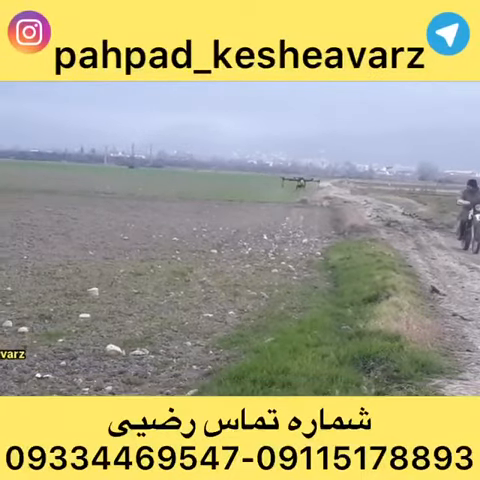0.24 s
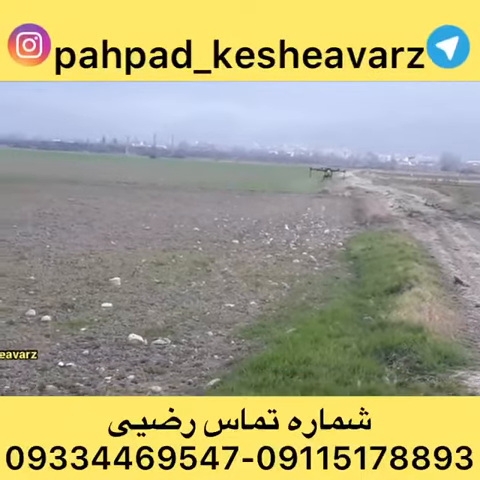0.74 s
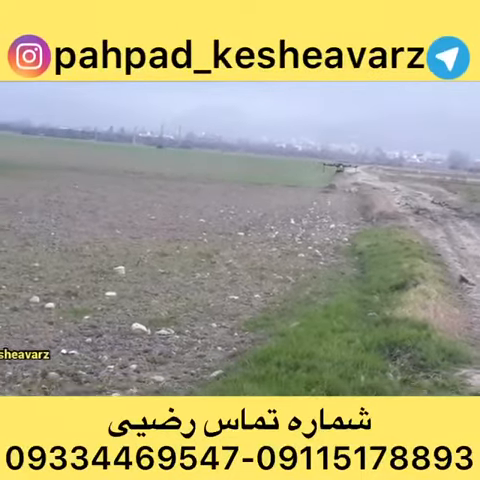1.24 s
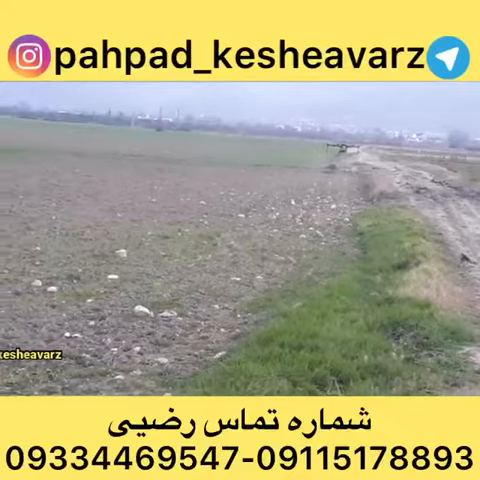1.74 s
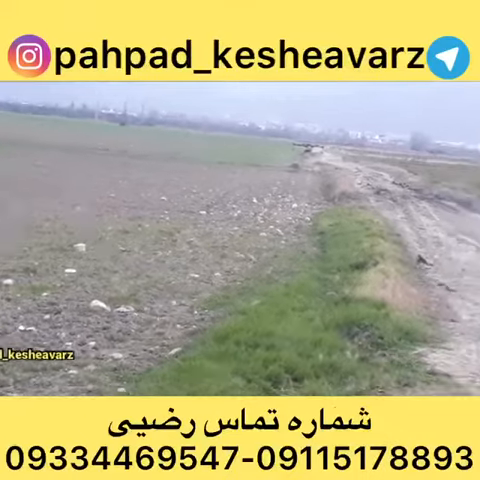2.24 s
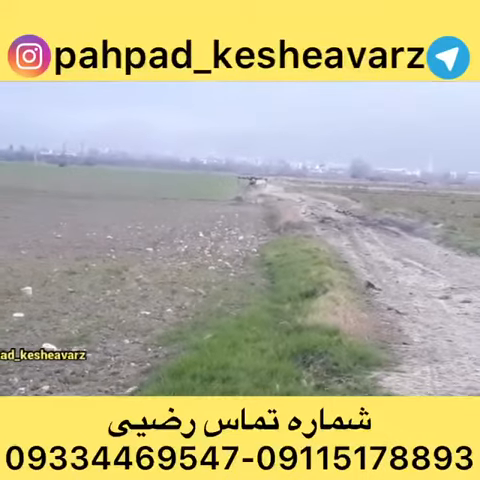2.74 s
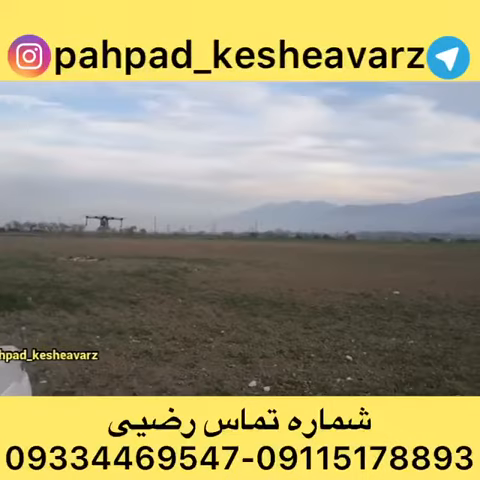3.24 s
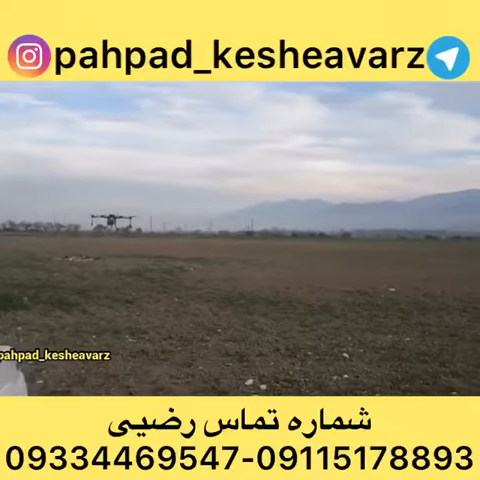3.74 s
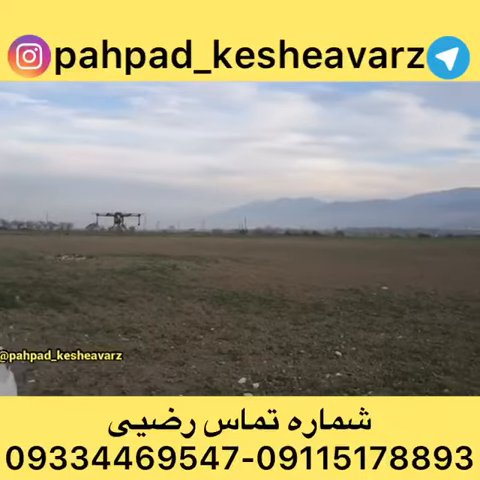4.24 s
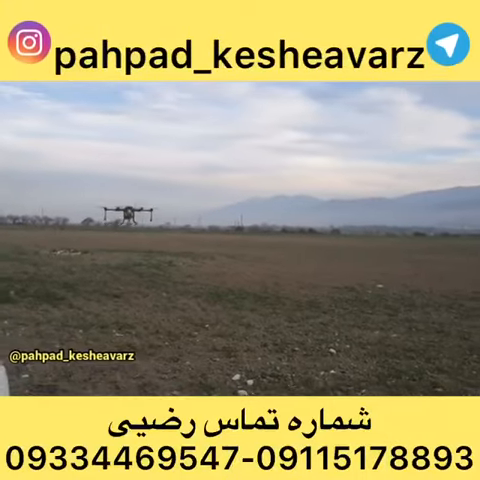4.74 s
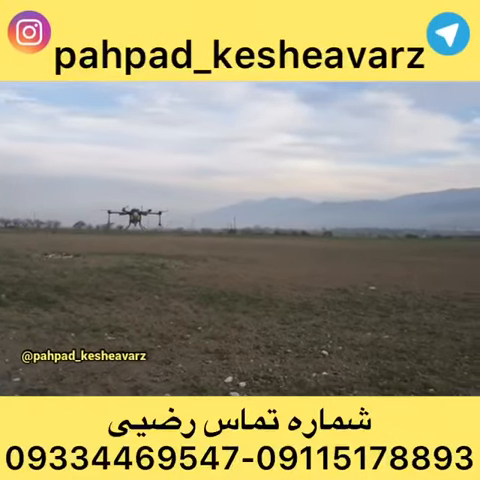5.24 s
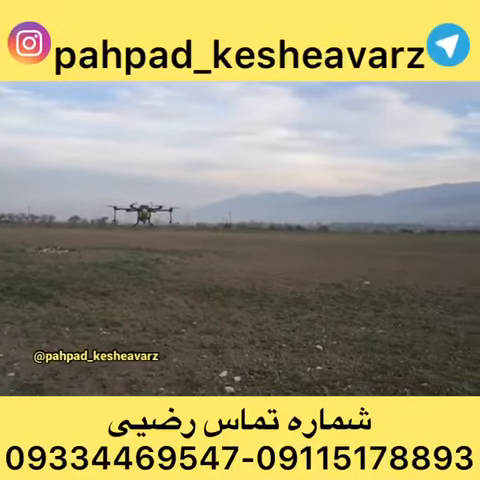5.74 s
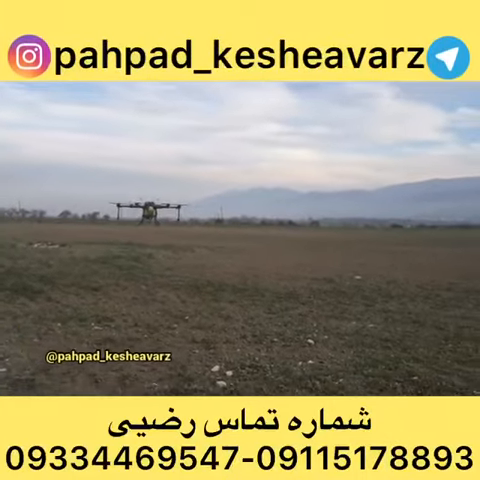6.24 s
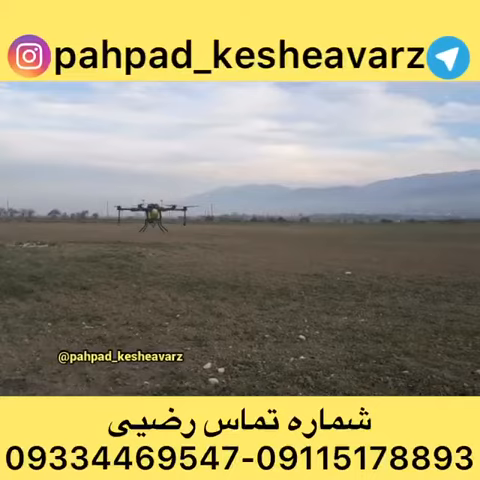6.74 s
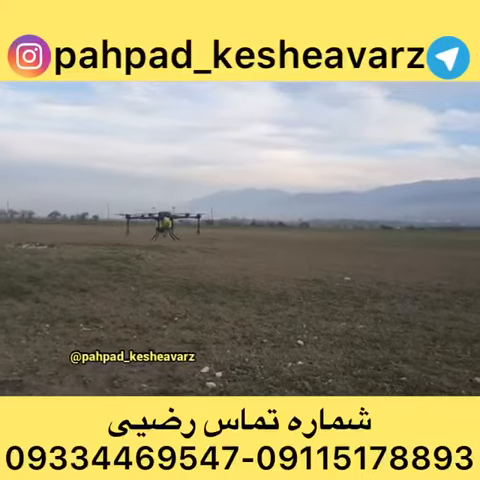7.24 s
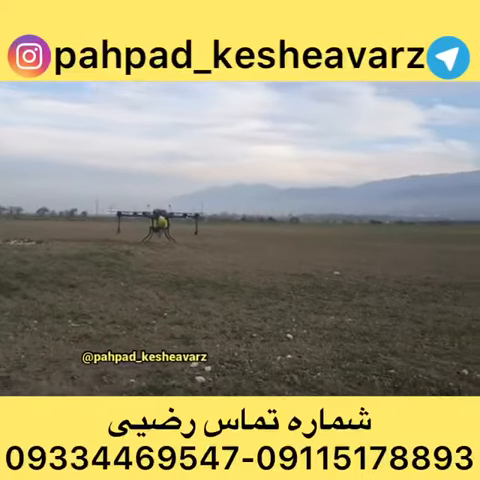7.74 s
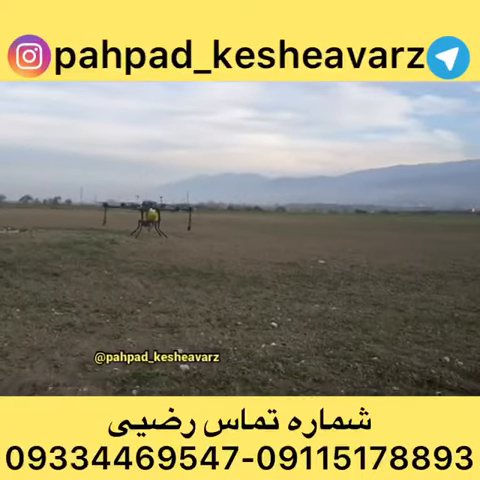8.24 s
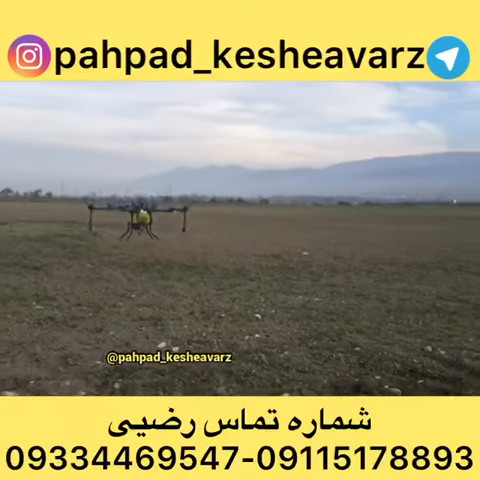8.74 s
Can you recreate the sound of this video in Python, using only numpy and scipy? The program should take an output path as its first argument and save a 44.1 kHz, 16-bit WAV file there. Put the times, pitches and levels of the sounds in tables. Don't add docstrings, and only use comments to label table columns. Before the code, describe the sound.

In an open field, a single-cylinder motorbike chugs close to a hand-held phone, slowly revving up, with valve ticks and a far drone's airy hiss. Fingers knock and rub the phone case, then the scene cuts abruptly. A six-rotor drone is left alone, hissing faintly, then humming and swishing louder as it flies nearer, with small crackling slaps in its blade wash.

```python
import sys
import numpy as np
from scipy import signal
from scipy.io import wavfile
from scipy.ndimage import uniform_filter1d

SR = 44100
rng = np.random.default_rng(int(sys.argv[2]) if len(sys.argv) > 2 else 0)


def dump_mix(stems):
    frames = np.atleast_2d(stems).T
    limited = np.clip(frames, -1, 1)
    pcm = np.round(limited * 32767).astype(np.int16)
    wavfile.write(sys.argv[1], SR, pcm)


def gain_from_db(level_db):
    decades = np.asarray(level_db, float) / 20
    return 10 ** decades


N = 396018
TIME = np.arange(N) / SR
CUT_S = 2.879
TURN_S = (2.3, 2.55)


def level(x, rms_db):
    return x * gain_from_db(rms_db) / np.sqrt(np.mean(x ** 2))


def curves(table):
    s, *columns = np.transpose(table)
    return [np.interp(TIME, s, column) for column in columns]


def band(x, lo_hz, hi_hz):
    edges_hz = [lo_hz, min(hi_hz, 0.45 * SR)]
    return signal.sosfilt(signal.butter(2, edges_hz, "bandpass", fs=SR, output="sos"), x)


def ring(x, modes):
    out = 0
    for k, (hz, width_hz, db) in enumerate(modes):
        b, a = signal.iirpeak(hz, hz / width_hz, fs=SR)
        out = out + (-1) ** k * gain_from_db(db) * signal.lfilter(b, a, x)
    return out


def walk(rate_hz, size=1):
    steps = rng.standard_normal(int(N / SR * 50))
    return 1.22 * np.interp(TIME[::size] * rate_hz, np.arange(len(steps)), steps)


def bump(centre_s, width_s):
    return np.exp(-np.minimum(((TIME - centre_s) / width_s) ** 2, 20))


def parts(table, mid_db, shares, pose):
    closer_db = curves(table)[0] - mid_db
    return [mid_db + db + follow * closer_db + pose_db * pose for db, follow, pose_db in shares]


def swish(span, turns, share_db, airs, change_s, parts_db, edges_hz, sharp, patchy_db):
    n = len(TIME[span])
    puffs = 0
    for turn, db in zip(turns, share_db):
        blade_pass = np.exp(sharp * np.cos(2 * np.pi * turn[span]))
        puffs = puffs + gain_from_db(db) * blade_pass * rng.standard_normal(n)
    puffs = level(puffs / np.sqrt(uniform_filter1d(puffs ** 2, SR // 4)), 0)
    hz, s, frames = signal.stft(puffs, SR, nperseg=1024, noverlap=768)
    hz, s = np.maximum(hz, 1), s + TIME[span][0]

    colours = []
    for air in airs:
        air_hz, air_db = np.transpose(air)
        colours.append(gain_from_db(np.interp(np.log(hz), np.log(air_hz), air_db)))
    colours = np.array(colours)
    weights = (1, 0, 0, 0), (0, 1, 1, 0), (0, 0, 0, 1)
    poses = np.array([np.interp(s, change_s, w) for w in weights])

    low, main, treble = (1 / (1 + (hz / edge) ** 8) for edge in edges_hz)
    gain = 0
    for region, db in zip((main - low, low, treble - main, 1 - treble), parts_db):
        shapes = colours * region
        shapes = shapes / np.sqrt(np.mean(shapes ** 2, axis=1, keepdims=True))
        gain = gain + shapes.T @ poses * gain_from_db(np.interp(s, TIME, db + patchy_db * walk(14)))
    out = np.zeros(N)
    out[span] = signal.istft(frames * gain, SR, nperseg=1024, noverlap=768)[1][:n]
    return out


# start_s, swish_level_db
NEAR_APPROACH = [(2.89, -44), (3.3, -40), (3.7, -37.5), (3.97, -35.5), (4.25, -37.5), (4.7, -34.5),
                 (5.4, -29), (5.7, -28.5), (6.09, -30), (6.9, -26), (7.35, -27.5), (7.7, -27.5),
                 (8.17, -26.5), (8.5, -24), (8.8, -22), (8.97, -22.5)]
# start_s, blade_rate_hz of rotors 1-6
MOTORS = [(2.9, 106.5, 105, 100, 98, 94.5, 92.5), (3.5, 107, 104.5, 100.5, 100, 95, 93.5),
          (4.1, 106, 103.5, 99.5, 102, 95.5, 94.5), (4.6, 105.5, 103, 100, 101, 97, 95),
          (5.0, 104, 103, 97.2, 98.5, 93.5, 90.8), (5.35, 106, 104, 97.3, 100.3, 93, 90.5),
          (5.8, 107.5, 104, 99, 102.6, 93.5, 91), (6.3, 105, 101, 96, 99.5, 95, 90.5),
          (6.7, 106.5, 103.5, 97, 99.5, 96.5, 92), (7.1, 105.5, 104, 98, 100, 96.5, 93.3),
          (7.5, 103.5, 101.5, 97.3, 95.5, 99, 94), (7.9, 103.5, 100, 96.5, 95, 99, 93.7),
          (8.2, 102, 101, 96.2, 95, 98.5, 93), (8.5, 99.5, 101.5, 96, 95.5, 98, 94.5),
          (8.98, 97, 102.5, 97, 96, 98, 95)]
# start_s, level_db of rotors 1-6
AIM = [(3.1, 1.5, -2, 0, -1.5, -2, -3), (3.45, -0.5, -2, 2.5, -2, -4.0, 1.0),
       (3.8, -2.5, -2.5, 4, 2.5, -4.5, -1.5), (4.15, -6, -5.5, 3.5, -4.0, -3.5, -2),
       (4.5, -3, -6.5, 4.5, 4, -8.5, -9.5), (4.85, 1.5, 3.5, 1.5, -6, -5.5, -3),
       (5.2, 1.5, -2.5, -4.5, 0, 0.5, 5), (5.55, 2.0, -1, 2, 2.0, 0, -5.5),
       (5.9, -2, 4.5, 2, -1.0, -3, -10), (6.25, -9.5, -1, -2, 1.5, -7, -9),
       (6.6, 0.0, -3.5, 0, -0.5, -1.5, 1), (6.95, 0.5, 1, -2.5, -3.5, -2.5, -9.5),
       (7.3, -1, 0, 2.5, 1.5, -0.5, -4.5), (7.65, 0.5, -1.5, -2, 1.5, -1.5, 4),
       (8.0, -7.5, -0.5, 0.5, -4, 5, 0.5), (8.35, -1.5, 1, 3.0, -2, -0.5, -1.0),
       (8.7, -4.5, -2, -2, 2.5, -3, -1.0), (8.85, 1.5, -4, 0.5, 2, -4, 1.0)]
# blade_rate_multiple, level_db
BLADE = [(1, 2.5), (2, 2), (3, -4), (4, -1), (5, -2), (6, -2), (7, -6.5), (8, -4), (9, -10), (10, -20)]
# blade_rate_multiple, level_db
LOW_BLADE = [(1, 0), (2, -1.5), (3, -3), (4, -8.5), (5, -9.5), (6, -7), (7, -3.5), (8, -6), (9, -6),
             (10, -9.5)]
BRIGHT_DB = [0.5, 0.5, 1, 2.5, 0, -4]
# freq_hz, density_db_per_hz
LOW_AIR = [(80, -15), (436, -18), (830, -5), (1550, -8), (2200, -0.5), (2450, -3), (2850, 1.5),
           (3250, -5.5), (4350, -6.5), (4520, -10), (4720, -16.5), (4950, -21.5), (5150, -14), (5600, -17),
           (5880, -22.5), (6050, -15.5), (6300, -16.5), (6550, -22.5), (6750, -23.5), (6950, -21.5),
           (7400, -28.5), (7680, -30), (7900, -27.5), (8250, -26), (8500, -37), (8850, -26.5),
           (9300, -33.5)]
# freq_hz, density_db_per_hz
CLIMB_AIR = [(40, -46), (150, -16.5), (300, -14), (440, -16), (600, -11.5), (800, -7), (1080, -11.5),
             (1350, -6.5), (1650, -9.5), (2200, -3.5), (2450, -4.5), (2700, -0.5), (2900, -3), (3150, -7),
             (3450, -4), (3900, -10.5), (4300, -7), (5400, -15.5), (5700, -17.5), (6050, -24), (6250, -24),
             (6600, -19.5), (6970, -24), (7250, -21), (7500, -17.5), (7750, -23.5), (8150, -27),
             (8400, -20.5), (8650, -15), (9000, -25.5), (9400, -54.5)]
# freq_hz, density_db_per_hz
NEAR_AIR = [(40, -45), (150, -16.5), (300, -16), (440, -19), (600, -12.5), (800, -6.5), (1080, -6),
            (1290, -3.5), (1600, -5.5), (2200, -0.5), (2750, 2), (3500, -2), (4500, -4.5), (5900, -12.5),
            (6300, -17), (6750, -18.5), (6980, -23), (7170, -16.5), (7400, -21), (7950, -18.5),
            (8500, -14.5), (8850, -17), (9300, -46)]
# mid_distance_db, approach_share (ratio), handling_extra_db
NEAR_PARTS = [
    (-0.54, 0.86, -2.3),
    (-8.5, 0.72, 4.5),
    (-12.5, 0.93, -1),
    (-18, 0.87, 9.5),
]
# low_hz, high_hz, added_share (ratio)
CLOSE = [(1950, 4900, 0.12), (4100, 5300, -0.36), (7060, 7600, -.4), (614, 1100, -.25)]
# start_s, peak_db, sign (+1/-1)
SLAPS = [(4.2452, -25, -1), (4.4738, -26, -1), (4.7248, -17, 1), (4.7733, -24, 1), (4.8321, -22, 1),
         (5.1098, -21, -1), (5.4687, -19, 1), (5.5554, -19, 1), (5.6278, -17, -1), (6.9736, -17, 1),
         (6.9832, -17, 1), (7.458, -18, 1), (7.5624, -16, 1), (7.5721, -18, 1), (7.5832, -14, 1),
         (7.6302, -16, 1), (7.7267, -18, 1), (8.4604, -15, -1)]


def near_drone():
    mid_db, tone_db, tone_follow = -33, -46.5, 0.5
    skim_db = -3
    first_lag = 0.38
    trim_hz, trims_hz, jitter_hz, jitters_hz = 0.25, 1.5, 0.22, 9
    turns = []
    for rate_hz in curves(MOTORS):
        rate_hz = rate_hz + trim_hz * walk(trims_hz) + jitter_hz * walk(jitters_hz)
        turns.append(np.cumsum(rate_hz) / SR + rng.random())
    aim_db = np.array([db + 1.2 * walk(4) for db in curves(AIM)])
    closer_db = curves(NEAR_APPROACH)[0] - mid_db
    gains = gain_from_db(aim_db) * gain_from_db(tone_db + tone_follow * closer_db) / np.sqrt(len(aim_db) / 2)

    tones, step, heard = np.zeros(N), 64, slice(int(CUT_S * SR) - 256, N)
    risen = np.interp(TIME[::step], (3.8, 6.5), [0, 1])
    lag_db = -first_lag * closer_db[::step]
    for (k, high_db), (_, low_db) in zip(BLADE, LOW_BLADE):
        order_db = low_db + skim_db + risen * (high_db - low_db - skim_db) + (k == 1) * lag_db
        for turn, gain, bright_db in zip(turns, gains, BRIGHT_DB):
            flutter_db = order_db + (k > 4) * bright_db + 2.4 * walk(7, size=step)
            flutter = np.interp(TIME[heard], TIME[::step], gain_from_db(flutter_db) * gain[::step])
            tones[heard] += flutter * np.sin(2 * np.pi * (k * turn[heard] + rng.random()))

    handled = bump(4.365, 0.37)
    parts_db = parts(NEAR_APPROACH, mid_db, NEAR_PARTS, handled)
    air = swish(heard, turns, 0.61 * aim_db[:, heard], (LOW_AIR, CLIMB_AIR, NEAR_AIR),
                (4.2, 4.8, 6.0, 6.9), parts_db, (1600, 4150, 6400), sharp=0.56, patchy_db=0.68)
    bounce = 0.66 * np.exp(-((TIME - 5.2) / 0.74) ** 2) * band(air, 625, 957)
    overhead = np.interp(TIME, (8.2, 8.6), [0, 1])
    close = overhead * sum(share * band(air, lo_hz, hi_hz) for lo_hz, hi_hz, share in CLOSE)

    slap_hz = 2800
    for start_s, peak_db, sign in SLAPS:
        near = slice(int(start_s * SR) - 40, int(start_s * SR) + 40)
        u = (np.pi * slap_hz * (TIME[near] - start_s)) ** 2
        tones[near] += sign * gain_from_db(peak_db) * (1 - 2 * u) * np.exp(-u)
    return tones + air + close + bounce


# start_s, firing_rate_hz
REVS = [(0, 18.54), (.36, 19.39), (.72, 19.66), (1.08, 20.84), (1.44, 21.68), (1.8, 21.63), (2.16, 22.75),
        (2.52, 22.8), (2.88, 23.6)]
# freq_hz, width_hz, level_db
PIPE = [(110, 18, -9), (157, 24, 0), (260, 60, -10.5), (350, 90, -16)]
# freq_hz, width_hz, level_db
CASING = [(592, 24, -5), (750, 38, -6.5), (854, 48, -1.5), (1172, 56, -0.5), (1825, 100, -11)]
# freq_hz, width_hz, level_db
VALVE = [(5150, 200, 0), (4200, 180, -7), (4750, 400, -13), (7500, 2500, -27)]


def motorbike():
    revs_hz = curves(REVS)[0]
    extra_hz = revs_hz - 18.5
    turn = np.cumsum(revs_hz) / SR + 0.1027
    fired = np.r_[0, np.flatnonzero(np.diff(np.floor(turn)))]
    chance = rng.standard_normal((len(fired), 2))
    late = (SR * 0.0004 * chance[:, 0]).astype(int)
    bangs = np.zeros(N)
    bangs[np.clip(fired + late, 0, N - 1)] = gain_from_db(1.1 * chance[:, 1])

    def delayed(delay_s):
        return np.roll(bangs, int(delay_s * SR))

    def pulse(sharp, phase):
        return np.exp(sharp * np.cos(2 * np.pi * (turn - phase)))

    echoes = bangs + 0.75 * delayed(0.0063) + 0.6 * delayed(0.0129)
    gas = pulse(0.5, 0.3) * rng.standard_normal(N)
    exhaust = level(ring(echoes, PIPE), 0) + level(ring(gas, PIPE[:3]), -17)
    exhaust = exhaust + level(ring(gas, PIPE[:1]), -13) + level(band(gas, 200, 400), -11)
    boom = gain_from_db(2 - 1.6 * extra_hz) * band(exhaust, 99, 130)
    bark = gain_from_db(-12 + 1.5 * extra_hz) * band(exhaust, 285, 430)
    exhaust = exhaust + boom + bark

    gear_turn = 12 * turn + 0.22 * walk(30)
    growl = pulse(0.5, 0.03) * gain_from_db(3.0 * walk(20)) * np.cos(2 * np.pi * gear_turn)
    lag = np.clip(0.2 + 0.3 * (extra_hz - 1), 0.2, 0.55)
    whine_turn = np.cumsum(712 + 11 * extra_hz) / SR + 0.2 * walk(40)
    whine = pulse(1.2, lag) * gain_from_db(3.0 * walk(25)) * np.cos(2 * np.pi * whine_turn)
    casing = ring(gas + level(echoes, -9.0), CASING)
    engine = level(band(exhaust, 74, 420), 0) + level(growl, -10)
    engine = engine + level(whine, -13.0) + level(casing, -13.0)
    head = level(ring(delayed(0.005), [(578, 45, 0)]), -21)
    engine = engine + gain_from_db(1.3 * extra_hz) * head

    clack = level(delayed(0.0112), -1.5) + level(pulse(9, 0.36) * rng.standard_normal(N), 0)
    ticks = level(band(ring(clack, VALVE), 3600, 9000), 0)
    engine_db = -39.5 + 1.05 * extra_hz
    tick_db = -54 + 1.44 * extra_hz + np.interp(TIME, TURN_S, [0, -1]) + 2.0 * walk(16)
    tick_db = tick_db - 10 * bump(2.5, 0.07)
    return gain_from_db(engine_db) * level(engine, 0) + gain_from_db(tick_db) * ticks


# start_s, peak_db, push_ms, sign (+1/-1)
KNOCKS = [(2.3502, -24, .4, 1), (2.3631, -21, 1.5, -1), (2.3637, -19, 1.6, -1), (2.3638, -19, .5, -1),
          (2.3853, -22, .35, -1), (2.4035, -22, .2, 1), (2.4065, -13, .35, 1), (2.4078, -21, 2.2, -1),
          (2.4125, -25, .25, -1), (2.41615, -20, .25, -1), (2.4159, -13, .3, 1), (2.418, -16, .3, 1),
          (4.3285, -23, .8, 1), (4.3402, -17, 1.2, 1), (4.3403, -18, .2, 1), (4.32855, -22, .25, 1),
          (5.99, -34, 3, 1)]


def finger():
    rub_peak_s, slip_s = 2.41, 0.0215
    rub_db = np.interp(TIME, (2.345, rub_peak_s, 2.425), (-38.5, -35.5, -56.5), left=-120, right=-120)
    rub_db = rub_db + 4 * np.cos(2 * np.pi * (TIME - rub_peak_s) / slip_s)
    out = gain_from_db(rub_db) * level(band(rng.standard_normal(N), 1200, 8500), 0)
    for start_s, peak_db, push_ms, sign in KNOCKS:
        near = slice(int(start_s * SR) - 500, int(start_s * SR) + 500)
        u = (TIME[near] - start_s) * 1000 / push_ms
        push, rebound = np.exp(-(3.0 * u) ** 2), 0.75 * np.exp(-(1.4 * (u - 0.85)) ** 2)
        out[near] += sign * gain_from_db(peak_db) * (push - rebound)
    return out


# start_s, swish_level_db
FAR_SWELLS = [(0, -40.5), (.7, -41.5), (1.4, -41), (2.0, -40.5), (2.35, -38), (2.55, -48), (2.7, -48.5),
              (2.87, -46)]
# blade_rate_hz, share_db
FAR_ROTORS = [(113.4, -14), (94.4, -15), (107.7, -7), (102.4, 6), (88.9, -6.5), (105.7, 5.5)]
# freq_hz, density_db_per_hz
FAR_AIR = [(400, -19), (550, -17.5), (660, -9), (733, -8), (1000, -13), (1380, -17), (1840, -4.5),
           (2060, -11.5), (2300, -1), (2550, 3), (2750, -3.5), (2950, -10.5), (3350, -7.5), (3850, -18),
           (4250, -13), (4600, -19), (5000, -16.5), (5550, -19.5), (5900, -17), (6900, -22), (7500, -22.5),
           (8050, -28.5), (8600, -23.5), (9000, -29.5), (9400, -45)]
# freq_hz, density_db_per_hz
SWUNG_AIR = [(400, -11), (750, -5.5), (1050, -12), (1450, -13), (1950, -1.5), (2320, -5), (2700, 0),
             (3100, -6.5), (3450, -12), (3900, -8.5), (4300, -17), (4550, -6.5), (5100, -15), (5550, -17),
             (6700, -14.5), (8200, -19.5), (8600, -15.5), (9100, -41)]
# freq_hz, density_db_per_hz
TURNED_AIR = [(260, -46), (450, -8), (566, 5.5), (702, -6.5), (861, 2.5), (1200, -0.5), (1500, -11),
              (1800, -4), (2450, -13.5), (2850, -7.5), (3600, -14), (4000, -0.5), (4350, -16), (4600, -6),
              (5500, -22.5), (5750, -6), (6150, -11.5), (6700, -12), (8300, -11.5), (8900, -20.5),
              (9300, -51)]
# level_db, swell_share (ratio), turned_extra_db
FAR_PARTS = [
    (1.23, 1.05, 3.5),
    (-5, 0.095, 3.5),
    (-5.5, 0.33, -12),
    (-14.5, 0.53, 11),
]


def far_drone():
    turns = [np.cumsum(rate_hz + 0.711 * walk(1.36)) / SR for rate_hz, _ in FAR_ROTORS]
    share_db = [db for _, db in FAR_ROTORS]
    parts_db = parts(FAR_SWELLS, -41, FAR_PARTS, np.interp(TIME, TURN_S, [0, 1]))
    swing_s = (2.1, 1.7)
    return swish(slice(int(CUT_S * SR)), turns, share_db, (FAR_AIR, SWUNG_AIR, TURNED_AIR),
                 swing_s + TURN_S, parts_db, (1600, 3600, 6250), sharp=0.36, patchy_db=0.72)


def wind():
    return level(band(rng.standard_normal(N), 57, 130), -57.5)


def scene():
    first = np.clip((CUT_S - TIME) / 0.0013, 0, 1)
    takes = first * (motorbike() + far_drone()) + (1 - first) * near_drone()
    return (takes + finger() + wind())[None]


def starve(x, mask_db, scatter_db, from_hz, top_hz):
    hop = 1024
    k, n = np.arange(int(top_hz * 2 * hop / SR)) + 0.5, np.arange(2 * hop) + 0.5
    window = np.sin(np.pi * n / hop / 2)[:, None]
    basis = window * np.cos(np.pi / hop * np.outer(n + hop / 2, k)) * np.sqrt(2 / hop)
    halves = np.pad(x, (hop, 2 * hop - N % hop)).reshape(-1, hop)
    both = np.hstack([halves[:-1], halves[1:]])
    lines, line_hz = both @ basis, k * SR / 2 / hop
    patches = uniform_filter1d(rng.standard_normal((len(lines), 64)), size=3, axis=0) * np.sqrt(3)
    patches = np.repeat(patches, 8, axis=1)[:, :len(k)]
    loudness = np.sqrt(np.mean(lines ** 2, axis=1, keepdims=True))
    step = loudness * gain_from_db(mask_db + scatter_db * patches)
    step = step * np.minimum(line_hz / from_hz, 1) ** 2 * gain_from_db(5 - 8 * k / len(k))
    nearby = np.sqrt(np.abs(uniform_filter1d(lines ** 2, size=48, axis=1)))
    nearby = nearby * np.minimum(line_hz / 1900, 1) ** 2
    step = np.maximum(step, nearby * gain_from_db(-0.5 + 3 * patches))
    knocked = np.abs(both).max(axis=1) > 5.5 * both.std(axis=1)
    step = step * gain_from_db(-14.0 * knocked)[:, None]
    frames = (np.sign(lines) * np.floor(np.abs(lines) / step + 0.4) * step) @ basis.T
    return (frames[:-1, hop:] + frames[1:, :hop]).ravel()[:N]


def roll_off(x):
    return signal.sosfilt(signal.butter(12, 9700, fs=SR, output="sos"), x)


def record(dry):
    mic = signal.sosfilt(signal.butter(2, 55, "highpass", fs=SR, output="sos"), dry[0])
    mix = starve(mic, mask_db=-7.5, scatter_db=5, from_hz=3000, top_hz=9100)[None]
    return roll_off(mix)


dry = scene()
out = record(dry)
dump_mix(out)
```